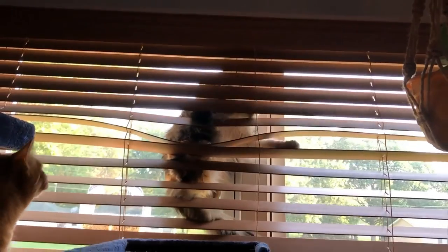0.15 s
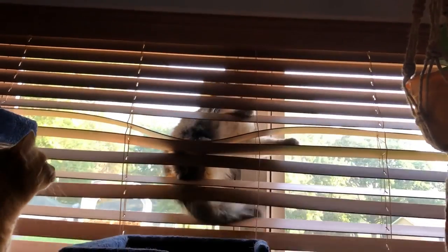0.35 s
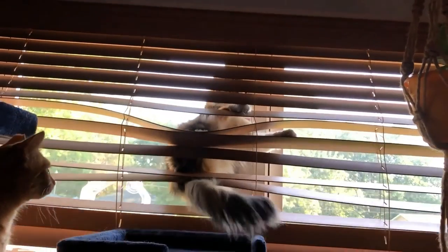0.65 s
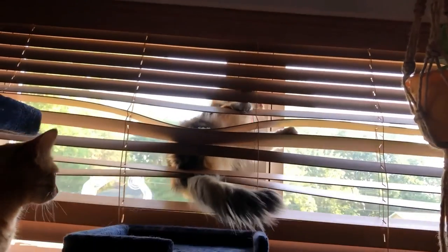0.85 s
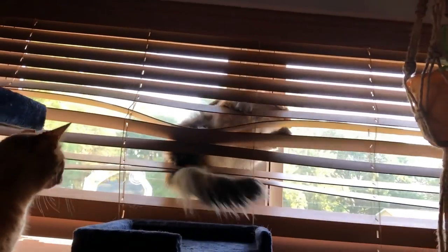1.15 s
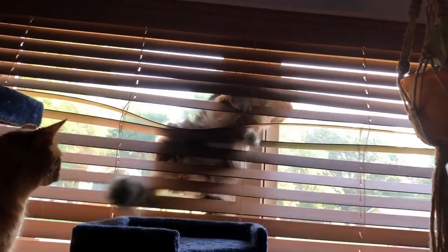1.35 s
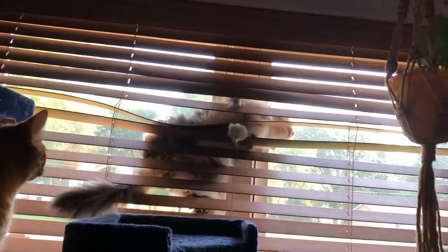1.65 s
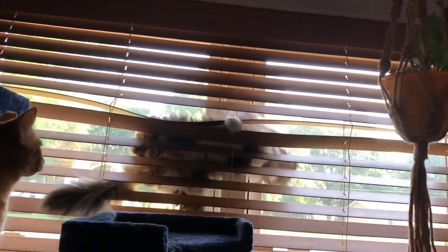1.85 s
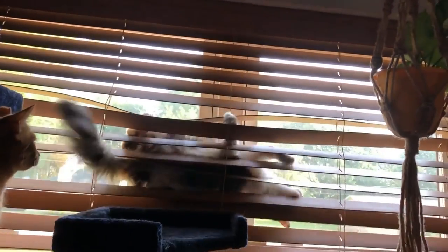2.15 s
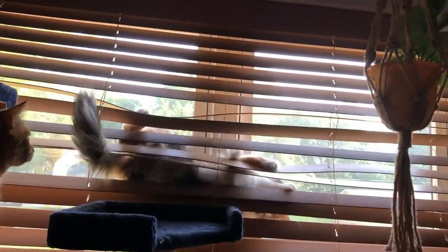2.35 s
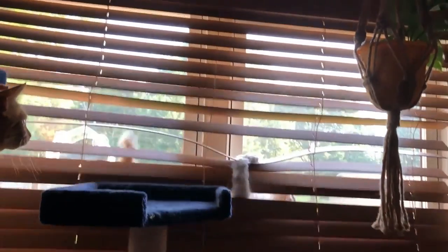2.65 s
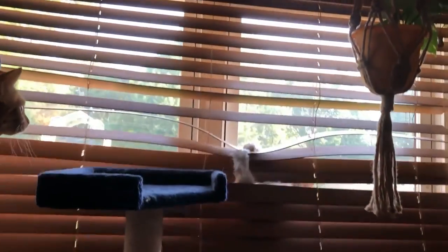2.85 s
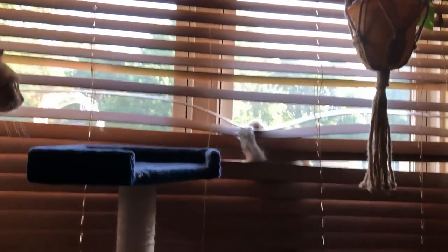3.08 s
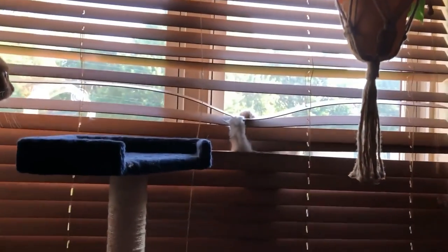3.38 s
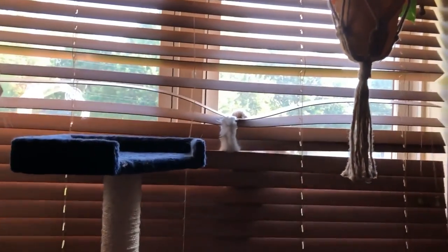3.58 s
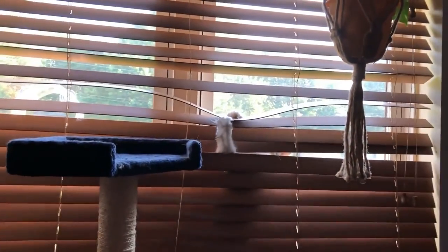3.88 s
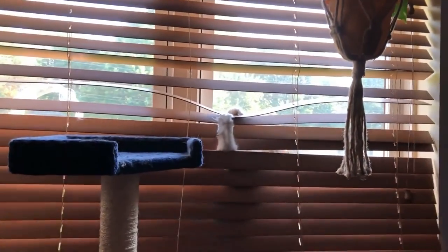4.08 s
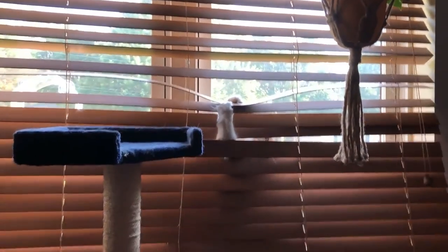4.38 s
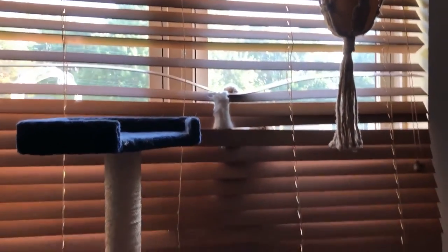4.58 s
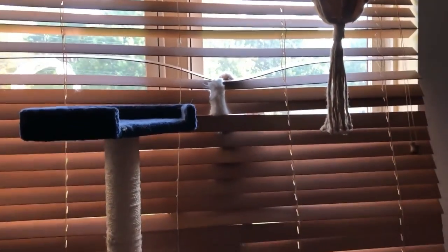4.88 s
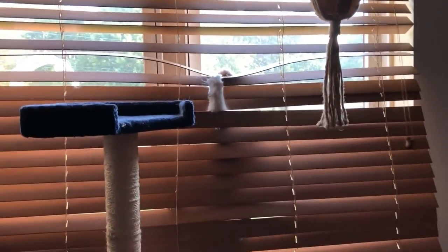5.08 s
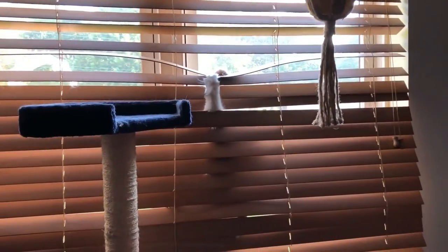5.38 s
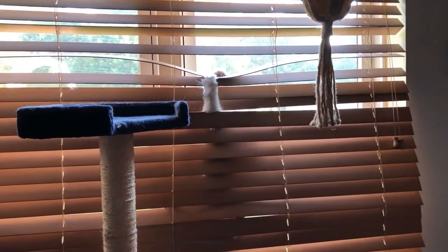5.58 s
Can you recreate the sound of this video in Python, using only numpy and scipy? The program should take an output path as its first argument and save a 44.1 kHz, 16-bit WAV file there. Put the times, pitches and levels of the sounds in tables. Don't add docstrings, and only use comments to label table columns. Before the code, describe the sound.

A quiet indoor room with faint room tone and a low building rumble, heard by a phone a few steps away. For the first 1.1 seconds there are only soft fur rustles, faint cord squeaks and tiny wooden ticks. At about 1.3 to 1.45 s the slats scrape and clatter in a quick cluster, then lighter clicks continue, with a small thud near 1.9 s. A bright snap at 2.2 s leads to more rattling, and from 2.7 to 2.9 s comes the densest, sharpest burst of dry wooden cracks. At 3.1 s the bottom rail bangs the sill in a tight run of hollow thuds, bouncing again near 3.26, 3.5 and 3.8 s, with slats shaking and short room echo. After 4 s only isolated clacks remain, clearest at 4.3 and 4.75 s, fading into very faint taps and brushing until the end around 5.7 s.

```python
import sys
import numpy as np
from scipy import signal
from scipy.fft import rfft, irfft, next_fast_len
from scipy.io import wavfile
from scipy.ndimage import uniform_filter1d, map_coordinates

SR = 44100
rng = np.random.default_rng(int(sys.argv[2]) if len(sys.argv) > 2 else 0)


def output_pcm(signal):
    pcm = np.clip(np.atleast_2d(signal).T, -1, 1) * 32767
    wavfile.write(sys.argv[1], SR, np.round(pcm).astype(np.int16))


def convert_level_to_amplitude(level_db):
    exponent = np.asarray(level_db, float) / 20
    return 10 ** exponent


N = 252693


def unit(x):
    return x / np.sqrt(np.mean(x ** 2) + 1e-20)


def along(points, hz):
    f, v = np.transpose(points)
    return np.interp(np.log(hz + 1), np.log(f + 1), v)


def filtered(x, response):
    m = next_fast_len(len(x) + 4096)
    return irfft(rfft(x, m) * response(np.fft.rfftfreq(m, 1 / SR)), m)[:len(x)]


def resonances(modes):
    def response(f):
        return sum((-1) ** k * convert_level_to_amplitude(db) * 1j * f * width / (hz * hz - f * f + 1j * f * width)
                   for k, (hz, width, db) in enumerate(modes))
    return response


def coloured(x, spectrum):
    return unit(filtered(x, lambda hz: convert_level_to_amplitude(along(spectrum, hz))))


def wander(points, per_s, n):
    return map_coordinates(rng.standard_normal(points), [np.arange(n) * per_s / SR])


def grainy(rate, spread_db):
    contact_db = -6 + spread_db * rng.uniform(-5.0, 1, N)
    kicks = (rng.random(N) < rate / SR) * convert_level_to_amplitude(contact_db)
    fade = convert_level_to_amplitude(-60 * np.arange(2000) / SR / 0.015)
    swell = convert_level_to_amplitude(2 * wander(200, 25, N))
    return swell * rng.standard_normal(N) * (1 + signal.fftconvolve(kicks, fade)[:N])


def swells(rows):
    t = np.arange(N) / SR
    return np.sqrt(sum(convert_level_to_amplitude(2 * db) * np.exp(-np.abs(2 * (t - s) / length) ** 1.77)
                       for s, length, db in rows))


def add(track, s, sound):
    part = track[round(s * SR):][:len(sound)]
    part += sound[:len(part)]


# t/s, peak/dB, brightness/dB, air gap ring/dB
FLAT_HITS = [(.1719, -53.5, -34, 0), (.242, -47.5, -10, -14), (1.3833, -38, -20, -0.5),
             (1.399, -34, -15, -10), (1.422, -39, -12, 7.5), (1.696, -38.5, 3, -2), (1.7626, -46, -24, 3.5),
             (1.8855, -43, -2, -8), (2.1191, -28.5, -12.5, -6.5), (2.389, -46, 5, 3),
             (2.5916, -41.5, -0.5, -6.5), (2.8794, -19, -12, -13.5), (2.924, -26, -26, -2),
             (3.0275, -30.5, -15, -10.5), (3.1118, -26.5, -45.5, -3), (3.125, -26, -25.5, -4),
             (3.1772, -35, -17.5, -24), (3.4664, -34.5, -24, -5.5), (3.6541, -36.5, -40, -32),
             (3.7299, -42.5, -4, -15), (3.8664, -41.5, -9.5, -0.5), (3.9866, -53, -27, 4),
             (4.564, -51.5, -14, 0), (5.3517, -70, -3, 17.5)]
# t/s, peak/dB, brightness/dB, air gap ring/dB
SLANT_HITS = [(1.1506, -52, -16, -2), (1.1628, -44.5, -13, -2.5), (1.257, -60.5, -15, 9),
              (1.3258, -37.5, 2, -7), (1.3942, -34, 1, -2), (1.6487, -58, 9, -20), (1.8574, -43.5, -4, -24),
              (2.3225, -43, -1.5, 5), (2.6387, -37.5, -21, -12), (2.7336, -34.5, 2.5, 1),
              (2.7434, -28.5, 0.5, -18), (2.8548, -17, -12.5, -17), (2.9902, -32.5, -4.5, -1),
              (3.5216, -27, -7, -8.5), (3.5373, -21.5, -15.5, -7.5), (4.0709, -34, -18, -5),
              (4.1653, -40.5, -28, -19), (4.7553, -29.5, -5, -5.5), (4.7843, -34, -28, -0.5),
              (5.1561, -42, -5.5, 0)]
# t/s, peak/dB, brightness/dB, air gap ring/dB
SNAP_BACKS = [
    (2.2177, -25, -2, -7),
    (2.687, -32, -7, -16),
    (2.7794, -26.5, -3, -10),
    (2.8882, -19, -4.5, -44.5),
    (5.2508, -57, -23, 6.5),
]
# t/s, peak/dB, brightness/dB, air gap ring/dB
EDGE_HITS = [(.332, -49.5, 4.5, -1), (.376, -48.5, -10, -8), (1.5993, -59.5, 5.5, -23),
             (.7392, -43.5, -10, -28), (1.279, -33.5, 2, -11.5), (1.916, -39, -3.5, -1),
             (2.043, -44.5, 2, -12), (2.1783, -34.5, -10, -7), (2.4441, -27.5, 0, 0.5),
             (2.5631, -32.5, -23, -24), (2.7957, -39.5, -19.5, -16), (2.8145, -37.5, -12, 1),
             (2.8717, -30.5, -3, 7.5), (3.3543, -38, -6.5, -34), (3.4418, -36.5, 1, 3.5),
             (3.766, -41.5, -26, -1.5), (3.8233, -47, 5.5, 6.5), (4.0216, -43, -1, -1.5),
             (4.3185, -27.5, -4, -11.5), (4.434, -47, -1, 7)]


def contacts():
    kinds = [(FLAT_HITS, 2010), (SLANT_HITS, 2770), (SNAP_BACKS, 3360), (EDGE_HITS, 4570)]
    pitch_scatter, short_db, longer_per_db = 0.01, -18, 0.005
    return [(s, db, hz * (1 + pitch_scatter * rng.standard_normal()), bright_db, gap_db,
             longer_per_db * (short_db - db))
            for table, hz in kinds for s, db, bright_db, gap_db in table]


# f/Hz, level/dB, time to fall 60 dB/s
SLAT_MODES = [(612, -2, 0.062), (950, 8.5, 0.012), (1200, 9, 0.028), (2360, -18, 0.0023),
              (3170, -30, 0.0033), (4300, -13.5, 0.03), (5340, -9.5, 0.0058), (7330, 11, 0.0034),
              (9200, -6, .012), (10800, -7, 0.011)]
# f/Hz, width/Hz, level/dB
AIR_GAP = [(1605, 160, 4), (1849, 61, 1.5), (1905, 76, -5.5)]
# f/Hz, level per Hz/dB
RATTLE_COLOUR = [(1500, -39.5), (2200, 3), (3000, 0.5), (4400, 2), (6000, -5), (9000, -11.5)]
# f/Hz, level per Hz/dB
FUR_COLOUR = [(3500, -37.5), (5500, -7), (9000, -0.5), (12000, -4), (15500, 0)]


def clacks():
    out, t = np.zeros(N), np.arange(SR // 7) / SR
    hz, level, t60 = np.transpose(SLAT_MODES)[:, :, None]
    for s, db, main_hz, bright_db, gap_db, length in contacts():
        long = 0.5 + 6.6 * np.clip(length, 0, 1)
        vary_level, vary_pitch = rng.standard_normal((2, len(SLAT_MODES), 1))
        band_db = np.where(hz < 1400, gap_db - 13.0, np.where(hz > 6000, bright_db - 16.0, -11))
        ring = convert_level_to_amplitude(level + band_db + 4.0 * vary_level - 60 * t / (t60 * long))
        ring = ring * np.sin(2 * np.pi * hz * (1 + 0.065 * vary_pitch) * t)

        bounces = rng.random(len(t)) < 1200 / SR
        chatter = bounces * rng.uniform(-0.92, 1, len(t)) * convert_level_to_amplitude(-3.5 - 60 * t / 0.068)
        chatter[0] = 1
        knock = convert_level_to_amplitude(-60 * t / 0.005) * np.sin(2 * np.pi * main_hz * t)
        main = signal.fftconvolve(chatter, knock)[:len(t)]

        rise = 1 - np.exp(-t / (0.0004 * long))
        fall = convert_level_to_amplitude(-60 * t / (0.04 * long)) + convert_level_to_amplitude(-0.5 - 60 * t / (0.054 * long))
        burst = rng.standard_normal((2, len(t))) * rise * fall
        crack = coloured(burst[0], RATTLE_COLOUR) * convert_level_to_amplitude(-26.5)
        crack = crack + coloured(burst[1], FUR_COLOUR) * convert_level_to_amplitude(bright_db - 20.5)
        tint = np.c_[hz, 2.5 * vary_pitch]
        crack = filtered(crack, lambda f: convert_level_to_amplitude(along(tint, f) - 6.0 * np.clip(f / 11000 - 1, 0, 1)))

        tremble = convert_level_to_amplitude(-6 - 60 * t / 0.31) * rng.standard_normal(len(t))
        shiver = burst[0] + convert_level_to_amplitude(16.5) * chatter + tremble
        gap = unit(filtered(shiver, resonances(AIR_GAP))) * convert_level_to_amplitude(gap_db - 17.5)
        add(out, s, convert_level_to_amplitude(db) * (convert_level_to_amplitude(-2.5) * ring.sum(0) + convert_level_to_amplitude(-3) * main + crack + gap))
    return out


# t/s, rise/s, time to fall 60 dB/s, peak/dB, f/Hz
SLAT_SCRAPES = [(.238, 0.003, 0.2, -55.5, 2040), (.525, .008, .04, -63, 10470),
                (1.327, .003, 0.34, -49, 2350), (1.36, 0.0023, 0.063, -43, 1040),
                (1.37, 0.032, 0.092, -35, 2390), (1.378, 0.014, 0.13, -39, 1136),
                (1.399, 0.0068, 0.089, -44, 1620), (1.384, 0.014, 0.1, -40, 5940),
                (1.405, 0.0082, 0.12, -44.5, 4300), (1.546, 0.0025, 0.054, -46, 1650),
                (1.598, 0.002, 0.028, -52, 6150), (1.695, 0.0016, 0.024, -57, 8900),
                (2.676, 0.014, 0.036, -40.5, 2780), (2.692, 0.0094, 0.071, -43.5, 940),
                (2.775, 0.0059, 0.034, -34, 3900), (2.797, .003, 0.027, -41, 5060),
                (2.814, 0.0027, 0.027, -41, 4800), (2.8529, 0.0045, 0.037, -24, 2650),
                (2.878, 0.011, .03, -34, 9600), (3.109, .005, 0.063, -28.5, 990),
                (3.11, 0.0028, 0.082, -32.5, 2160), (3.176, 0.0028, 0.031, -44.5, 4800),
                (3.764, 0.0021, 0.036, -47, 760), (4.784, 0.0036, 0.044, -57, 9700),
                (4.998, 0.0067, 0.035, -73, 9200), (5.06, 0.0032, .03, -76, 8200),
                (5.235, 0.011, 0.065, -68, 3180), (5.301, 0.0055, 0.035, -70, 8000),
                (.171, 0.00088, 0.026, -53.5, 2230), (.245, 0.01, 0.095, -56.5, 860),
                (0.636, 0.0092, 0.11, -62, 2860), (0.661, 0.01, 0.09, -56.5, 1200),
                (0.839, 0.011, 0.077, -61.5, 2600), (0.841, 0.012, 0.1, -59, 2010),
                (2.2183, 0.00076, 0.0096, -32.5, 1520), (2.322, 0.0029, 0.034, -46.5, 6100),
                (2.604, 0.0037, 0.035, -48, 6550), (2.638, 0.0034, .04, -54, 2800),
                (2.058, 0.0028, 0.037, -44, 1200), (3.398, 0.0023, 0.018, -48, 4600),
                (3.796, 0.0049, 0.21, -39.5, 754), (3, 0.0058, 0.054, -45, 800),
                (3.766, .004, 0.11, -47, 1460), (3.8, 0.0027, 0.034, -44, 800),
                (3.2, 0.0083, 0.073, -37, 610), (3.59, 0.018, .12, -48, 1850),
                (3.603, 0.0044, .04, -45, 640), (4.434, 0.0024, .04, -46, 960),
                (2.854, .002, .03, -36.5, 11000), (3.3, .003, 0.051, -50, 15000),
                (4.324, .003, .1, -49, 14000), (4.024, .004, .1, -55.5, 14900),
                (2.447, .004, .1, -47, 14800), (3.8, 0.011, 0.055, -52, 2300)]


def scrapes():
    out, t = np.zeros(N), np.arange(SR // 5) / SR
    for s, rise_s, t60, db, hz in SLAT_SCRAPES:
        mode = resonances([(hz, min(0.31 * hz, 1300), 0)])
        grit = rng.standard_normal(len(t))
        rub = unit(filtered(grit * np.abs(grit), lambda f: mode(f) ** 2))
        fade = convert_level_to_amplitude(db - 60 * np.maximum(t - rise_s, 0) / t60)
        add(out, s, fade * np.minimum(t / rise_s, 1) * rub)
    return out


# t/s, peak/dB, f/Hz
EDGE_TICKS = [(1.328, -37, 7000), (1.445, -34, 4000), (1.65, -43, 8400), (1.697, -28, 11000),
              (1.829, -40, 8200), (1.8587, -30, 8100), (1.8749, -43, 7500), (1.8884, -41.5, 7500),
              (1.9029, -42, 10300), (2.1186, -33, 3500), (2.1785, -36, 4000), (2.2175, -18, 5260),
              (2.6074, -35, 7400), (2.737, -33, 5200), (2.745, -30.5, 10000), (2.7988, -31, 9000),
              (2.816, -33.5, 5500), (2.8545, -24.5, 12000), (2.88, -22.5, 4400), (2.8862, -21.5, 3400),
              (2.888, -17, 6300), (3.0215, -34.5, 9000), (3.0799, -38, 8150), (3.1993, -40, 3460),
              (3.5394, -24.5, 5050), (3.8275, -44, 4500), (3.848, -38, 4400), (3.876, -37, 9000),
              (4.072, -34, 3300), (4.113, -43, 2400), (4.3189, -25.5, 5000), (4.321, -26, 4300),
              (4.3247, -24.5, 10000), (4.4414, -44, 11500), (4.7567, -37.5, 5080), (4.7838, -33, 2900)]


def ticks():
    out, t = np.zeros(N), np.arange(SR // 200) / SR
    for s, db, hz in EDGE_TICKS:
        damping = np.exp(-np.pi * 0.51 * hz * t)
        add(out, s, convert_level_to_amplitude(db + 6.5) * damping * np.sin(2 * np.pi * hz * t))
    return filtered(out, lambda hz: 1j * hz / (900 + 1j * hz))


# t/s, peak/dB, hardness/dB, board f/Hz
RAIL_THUDS = [(1.858, -33, -6.5, 238), (1.993, -53, 7, 290), (3.108, -22.5, -13, 341),
              (3.114, -16, -8.5, 375), (3.127, -19, -13, 367), (3.14, -16, -15, 360),
              (3.154, -16.5, -8.5, 277.4), (3.184, -26, -8, 290), (3.197, -30, -10, 330),
              (3.261, -19.5, -16.5, 386), (3.306, -35, -11, 360), (3.356, -34, -12, 282),
              (3.512, -20, -10, 275), (3.528, -30, -15, 278), (3.613, -28, -24, 278),
              (3.796, -21, -23, 310), (3.806, -25, -11, 290), (3.832, -25, -24, 372),
              (3.858, -27.5, -9.5, 270), (3.884, -33.5, -17, 244), (4.566, -34.5, -13, 320),
              (4.822, -43, -9, 301), (5.365, -49, -2, 233), (5.429, -49, -25, 320), (5.714, -47, -14, 333),
              (3.238, -32, -10, 293), (3.282, -32.5, -17, 354), (3.33, -38, -12, 320),
              (3.655, -46, -19, 302), (3.872, -32.5, -11.5, 320), (3.913, -46, -12, 290),
              (3.942, -47, -14, 320), (3.119, -25, -20, 264)]
# t/s, peak/dB, hardness/dB, rail f/Hz
RAIL_KNOCKS = [(1.284, -52, -19, 538), (1.399, -49.5, 17, 1200), (1.421, -37, -12, 1200),
               (1.699, -45, 9, 857), (1.777, -41, -3, 587), (2.1197, -32.5, 5, 1240),
               (2.215, -33.5, 1, 500), (2.334, -41.5, -2, 614), (2.388, -43.5, 11, 520),
               (2.447, -34, 3, 680), (2.469, -39.5, 10, 964), (2.496, -40, 5.5, 707),
               (2.692, -44.5, -2.5, 940), (2.738, -34.5, 1, 1296), (2.776, -44, -0.5, 1280),
               (2.814, -41, -1, 1110), (2.862, -24, 3.5, 849), (2.889, -28, 0.5, 730),
               (4.318, -38, 3, 1270), (4.433, -52, 8, 830), (4.756, -61, 18.5, 714), (5.157, -52, 5.5, 794),
               (5.396, -46.5, -2.5, 795), (5.479, -61, 11.5, 540)]


def blows():
    overtone = 2.766
    knocks = [(s, db, rng.choice(SILL_MODES[3:])[0], hard_db, hz) for s, db, hard_db, hz in RAIL_KNOCKS]
    thumps = [(s, db, hz, hard_db, overtone * hz * (1 + 0.056 * rng.choice([-1, 1])))
              for s, db, hard_db, hz in RAIL_THUDS]
    return knocks + thumps


# f/Hz, width/Hz, level/dB
SILL_MODES = [(130, 49, -10), (205, 30, -4), (264, 30, -2), (320, 34.6, -3), (369.7, 26.3, -3),
              (441, 57, -9)]
# f/Hz, width/Hz, level/dB
RAIL_MODES = [(620, 43, 3), (795, 147, -0.5), (931, 31.5, 3), (1023, 53, -2)]


def thuds():
    soft, hard, board = np.zeros((3, N))
    push = np.hanning(36)
    t = np.arange(SR // 12) / SR
    for s, db, hz, hard_db, rail_hz in blows():
        bounces = (rng.random(len(t)) < 150 / SR) * rng.uniform(-1.46, 1, len(t)) * convert_level_to_amplitude(-4.5 - 60 * t / 0.12)
        bounces[0] = 1
        add(soft, s, convert_level_to_amplitude(db + 13.5) * bounces)
        add(hard, s, convert_level_to_amplitude(db + hard_db + 15.0) * bounces)
        low = convert_level_to_amplitude(db + 2.5 - 60 * t / 0.056) * (1 - np.exp(-t / 0.0045))
        high = convert_level_to_amplitude(db + hard_db - 2.0 - 60 * t / 0.059) * (1 - np.exp(-t / 0.0018))
        add(board, s, low * np.sin(2 * np.pi * hz * t))
        add(board, s, high * np.sin(2 * np.pi * rail_hz * t))
    sill = filtered(np.convolve(soft, push)[:N], resonances(SILL_MODES))
    rail = filtered(np.convolve(hard, push[::2])[:N], resonances(RAIL_MODES))
    return board + sill + rail


# t/s, level/dB
BLIND_MOTION = [(0, -59.5), (.15, -79.5), (.28, -66), (.68, -59.5), (1.13, -71.5), (1.37, -63),
                (1.68, -59.5), (1.89, -54), (2.12, -59.5), (2.85, -50.5), (3.24, -53), (3.43, -59.5),
                (3.8, -57.5), (3.96, -66), (4.6, -61.5), (4.73, -72.5), (5.15, -74), (5.73, -74.5)]
# peak t/s, length/s, level/dB, weight on the slats/dB
FUR_BRUSHES = [(.01, 0.066, -90, 5), (0.352, 0.26, -65, 1), (0.96, 0.45, -68, 2.5),
               (1.343, 0.098, -56.5, 6.5), (1.43, 0.07, -45, -1), (1.476, 0.13, -55, 4),
               (1.924, 0.064, -55, 0.5), (2.346, 0.59, -59.5, -4), (2.75, 0.13, -48.5, 2),
               (2.807, 0.044, -47.5, -8.5), (3.01, 0.39, -54, 1.5), (3.332, 0.071, -57.5, 3),
               (3.819, 0.089, -57, 7), (4.125, 0.37, -73.5, 14.5), (4.52, 0.14, -67, -6),
               (5.006, 0.014, -75, 8.5), (5.438, 0.084, -78.5, 14)]
# peak t/s, length/s, level/dB
BODY_LEANS = [(.66, 0.098, -55.5), (.9, 0.19, -63), (1.52, 0.18, -51.5), (1.89, 0.15, -43),
              (2.5, 0.38, -54), (2.88, 0.051, -34.5), (3.23, 0.078, -39), (3.6, 0.18, -57),
              (3.99, 0.23, -50.5), (4.45, 0.13, -76), (5.4, 0.14, -77)]
# f/Hz, level per Hz/dB
MURMUR_COLOUR = [(350, 1.5), (600, 6.5), (1000, 1), (1400, 3), (1650, -3.5), (1900, 4.5), (2800, -21)]


def stir():
    move_s, move_db = np.transpose(BLIND_MOTION)
    murmur_db = np.interp(np.arange(N) / SR, move_s, move_db)
    more_db = murmur_db + 60
    pressed = swells([(s, length, db + weight_db) for s, length, db, weight_db in FUR_BRUSHES])
    fur = np.hypot(convert_level_to_amplitude(-76.5 + 0.5 * more_db), swells([row[:3] for row in FUR_BRUSHES]))
    rattle = np.hypot(convert_level_to_amplitude(-66 + 0.92 * more_db), convert_level_to_amplitude(-5) * pressed)
    murmur = np.hypot(convert_level_to_amplitude(murmur_db), convert_level_to_amplitude(-2) * pressed)
    frame = np.hypot(convert_level_to_amplitude(-62.5 + 0.75 * more_db), swells(BODY_LEANS))

    shuffle = grainy(rate=67, spread_db=1.5)
    hair = convert_level_to_amplitude(wander(80, 12, N)) * rng.standard_normal(N)
    loose = convert_level_to_amplitude(wander(80, 12, N)) * rng.standard_normal(N)
    creak = unit(filtered(grainy(rate=140, spread_db=5.5), resonances(SILL_MODES)))
    gap = unit(filtered(shuffle, resonances(AIR_GAP)))
    out = fur * coloured(hair, FUR_COLOUR) + rattle * coloured(loose, RATTLE_COLOUR)
    out += murmur * (convert_level_to_amplitude(0.5) * coloured(shuffle, MURMUR_COLOUR) + convert_level_to_amplitude(-9.5) * gap)
    return out + frame * convert_level_to_amplitude(-6.0) * creak


# t/s, length/s, first f/Hz, last f/Hz, level/dB
CORD_SLIDES = [(0, 0.16, 4700, 4300, -82), (0.2, .45, 1790, 1700, -65), (0.25, 0.16, 5240, 4950, -63),
               (0.384, 0.36, 4320, 4260, -67), (0.667, 0.45, 4300, 4300, -73.5),
               (0.675, .45, 10740, 10900, -66), (3.166, 0.28, 10360, 10650, -56.5),
               (3.707, 0.077, 10300, 10300, -50), (3.787, .1, 10600, 10800, -59),
               (0.413, .35, 1640, 1600, -71.5), (4.019, .28, 1620, 1590, -64),
               (4.5, 0.063, 2850, 2850, -67.5), (4.801, 0.19, 1630, 1630, -63),
               (5.168, 0.17, 1640, 1630, -71), (5.43, .05, 4000, 4000, -80), (3.738, 0.17, 4520, 4670, -55),
               (4.433, 0.24, 10800, 11000, -64.5)]


def cords():
    out, uneven = np.zeros(N), grainy(rate=60, spread_db=0)
    for s, length, first_hz, last_hz, db in CORD_SLIDES:
        n = round(length * SR)
        width_hz = 35 + first_hz ** 2 / 2e5
        rub = unit(filtered(uneven[round(s * SR):][:SR // 2], lambda f: np.exp(-(f / width_hz) ** 2)))[:n]
        pitch = (1 + 0.013 * wander(20, 22, n)) * np.linspace(first_hz, last_hz, n)
        stroke = signal.windows.tukey(n, 0.7)
        add(out, s, convert_level_to_amplitude(db) * stroke * rub * np.sin(2 * np.pi * np.cumsum(pitch) / SR))
    return out


# f/Hz, time to fall 60 dB/s
ROOM_DECAY = [(150, 0.48), (400, 0.54), (1600, 0.31), (4000, 0.37), (10000, 0.2)]


def room(x):
    out, step = np.zeros(N), SR // 8
    for start in range(0, N, step):
        hz, t, z = signal.stft(rng.standard_normal(SR // 2), SR, nperseg=256)
        fade = convert_level_to_amplitude(-60 * t / along(ROOM_DECAY, hz)[:, None])
        tail = signal.istft(z * fade, SR, nperseg=256)[1]
        answer = signal.fftconvolve(x[start:start + step], tail / np.linalg.norm(tail))
        add(out, start / SR + 0.0043, answer)
    return out


# peak t/s, length/s, level/dB
WALL_JOLTS = [
    (2.17, 0.12, -54),
    (2.75, 0.054, -62),
    (2.85, .15, -58.5),
    (3.12, .08, -65),
    (5.25, .06, -83),
]
# f/Hz, level per Hz/dB
RUMBLE_COLOUR = [(15, -30), (30, -12.5), (45, 8.5), (70, 0), (110, -2.5), (170, -32.5)]
# f/Hz, level per Hz/dB
ROOM_TONE_COLOUR = [(59, -36), (100, -6.5), (228, -11), (265, -8.5), (295, -19), (556, -18), (780, -15.5),
                    (868, -22), (7370, -59.5), (9300, -56), (15800, -38)]


def background():
    rumble = np.hypot(convert_level_to_amplitude(-69 - 1.5 * np.arange(N) / SR), swells(WALL_JOLTS))
    tone = convert_level_to_amplitude(-67) * coloured(rng.standard_normal(N), ROOM_TONE_COLOUR)
    return rumble * coloured(rng.standard_normal(N), RUMBLE_COLOUR) + tone


def scene():
    slats = clacks() + scrapes() + ticks()
    knocks = thuds()
    blind = slats + knocks + room(convert_level_to_amplitude(-6.0) * slats + convert_level_to_amplitude(-6.5) * knocks) + stir() + cords()
    blind = filtered(blind, lambda hz: (1j * hz / (95 + 1j * hz)) ** 2)
    return (blind + background())[None]


# t/s, loss/dB, lowest f/Hz
THIN_MOMENTS = [(.652, -40, 300), (.855, -16, 800), (1.622, -14, 2500), (2.155, -8, 3000),
                (2.497, -8, 2000), (3.648, -18, 3500), (4.266, -20, 2200), (4.522, -12, 500),
                (5.25, -14, 1800), (5.462, -15, 800)]


def thinned(x):
    hz, t, z = signal.stft(x, SR, nperseg=1024, noverlap=768)
    broad = uniform_filter1d(np.abs(z), size=5, axis=1)
    around = uniform_filter1d(broad, size=61, axis=0)
    weak = (broad < 1.75 * around) | (hz[:, None] > 6800)
    loss_db, boost_db = np.zeros(z.shape), np.zeros(z.shape)
    for s, db, low_hz in THIN_MOMENTS:
        above = hz[:, None] > low_hz
        loss_db += db * above * np.exp(-((t - s) / 0.011) ** 4)
        boost_db += 5 * above * np.exp(-((t - s) / 0.018) ** 4)
    gain_db = np.where(weak, loss_db, boost_db)
    return signal.istft(z * convert_level_to_amplitude(gain_db), SR, nperseg=1024, noverlap=768)[1][:N]


def low_pass(x):
    return signal.sosfilt(signal.butter(12, 16500, fs=SR, output="sos"), x)


def record(dry):
    top_hz = 15650
    x = filtered(thinned(dry[0]), lambda hz: np.where(hz < top_hz, 1, convert_level_to_amplitude(-47.5) * (hz < top_hz + 800)))
    return low_pass(x[None])


dry = scene()
out = record(dry)
output_pcm(out)
```